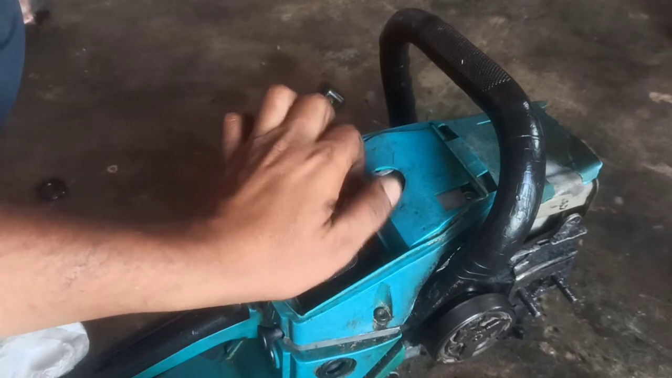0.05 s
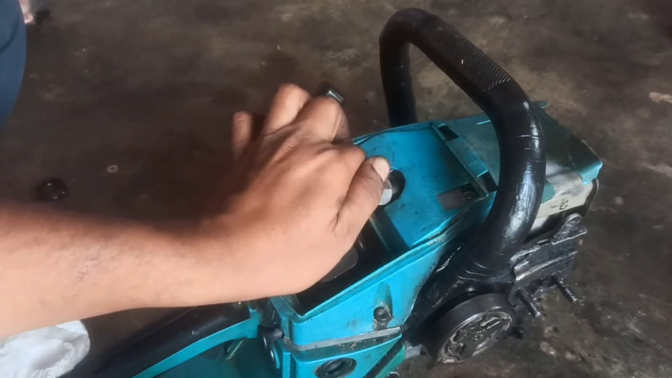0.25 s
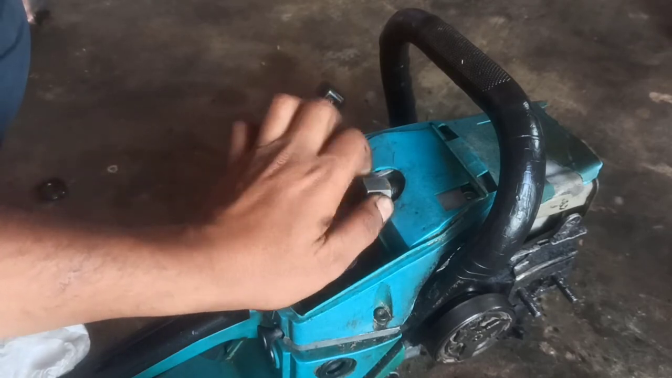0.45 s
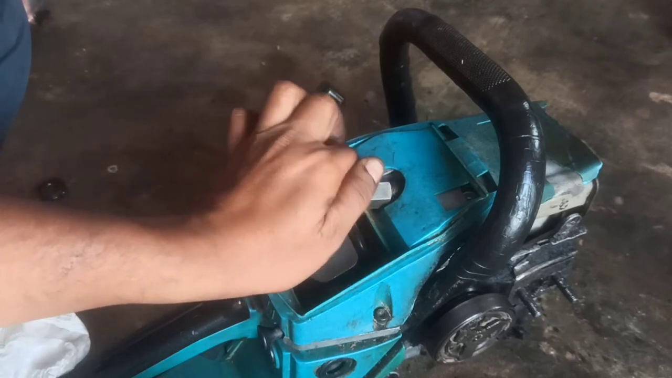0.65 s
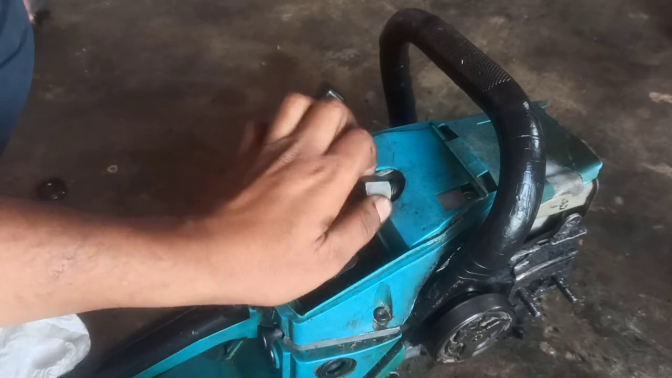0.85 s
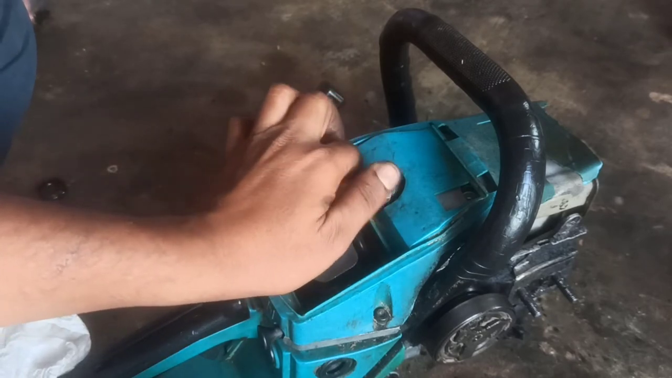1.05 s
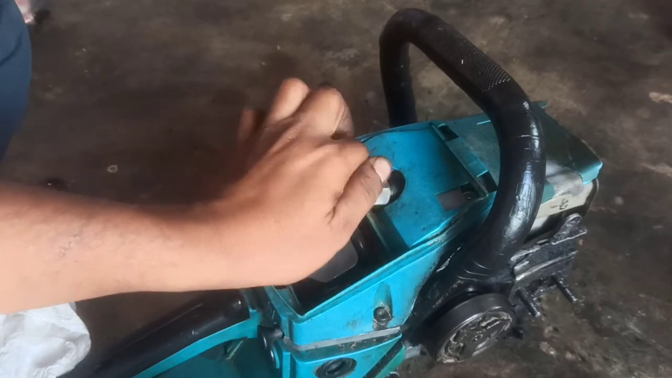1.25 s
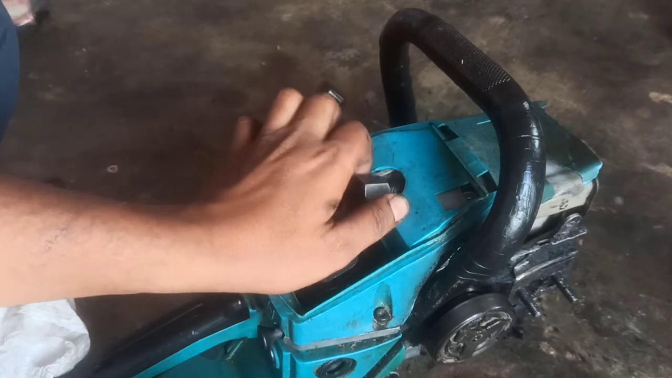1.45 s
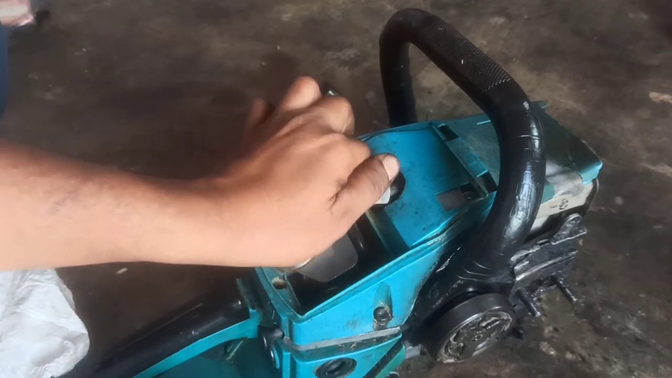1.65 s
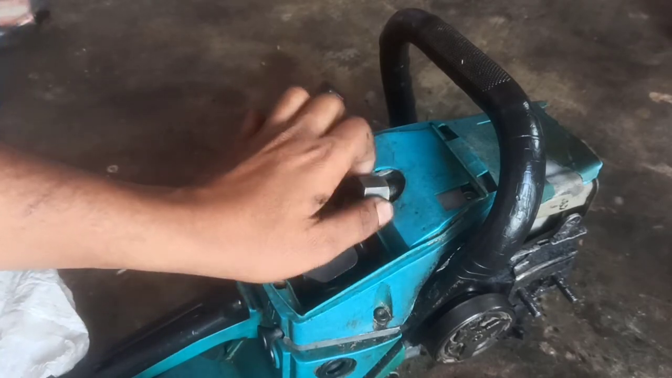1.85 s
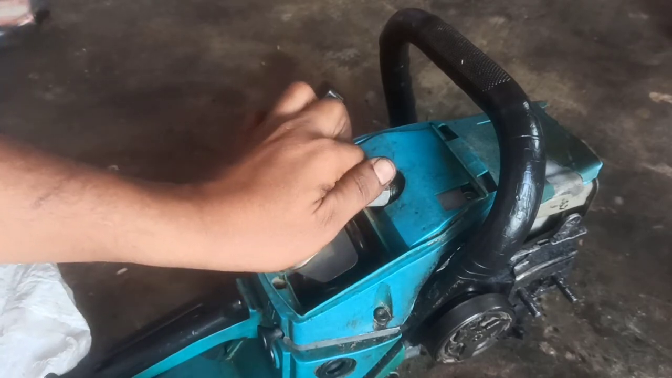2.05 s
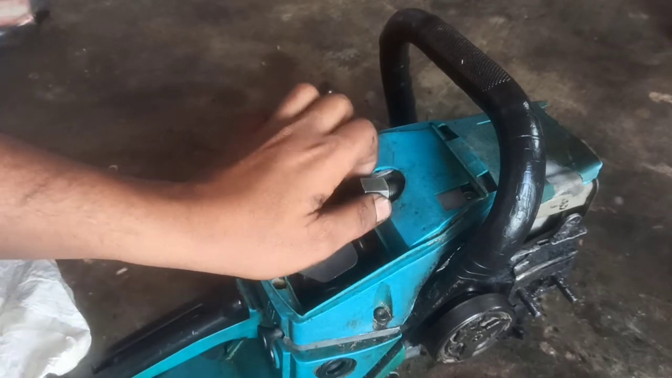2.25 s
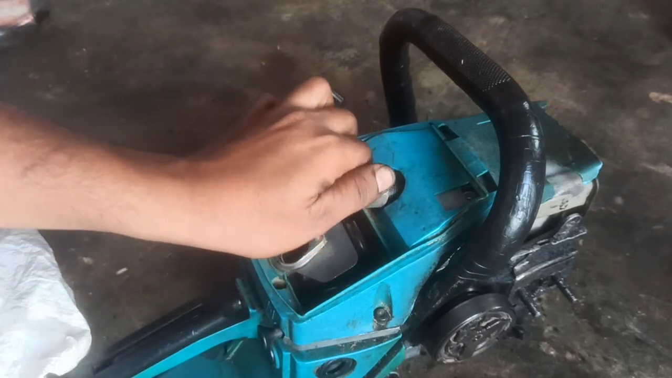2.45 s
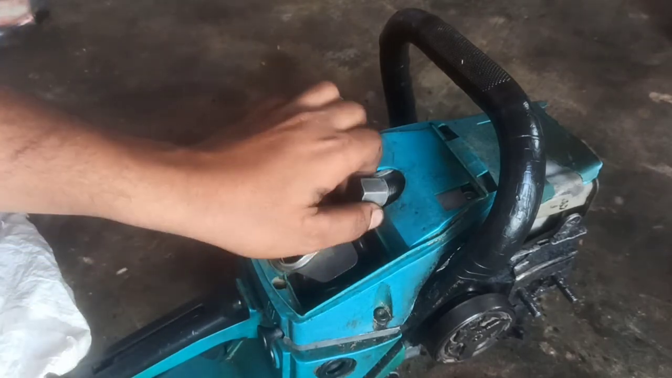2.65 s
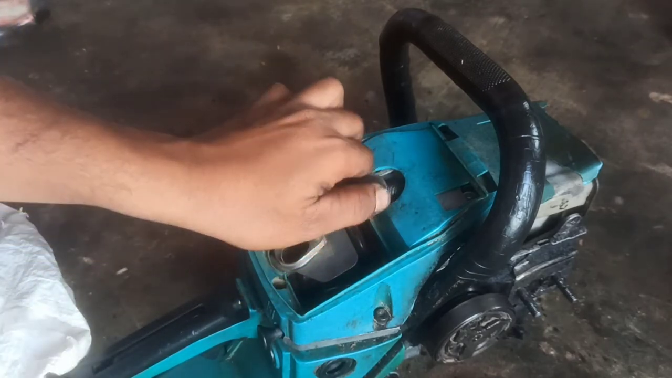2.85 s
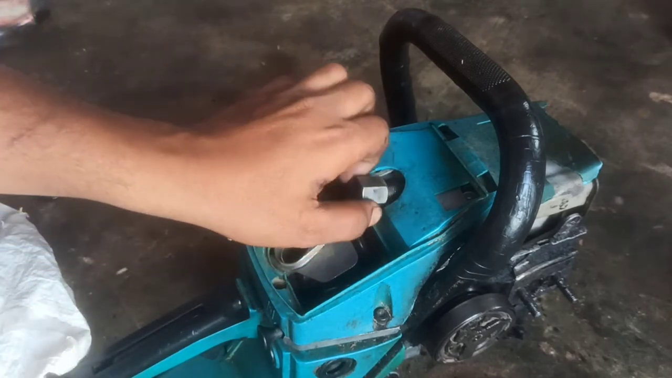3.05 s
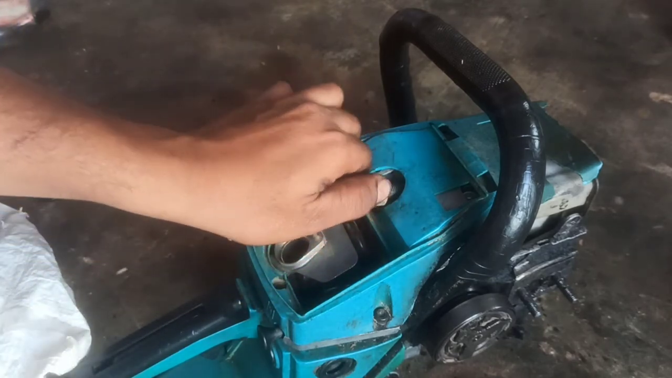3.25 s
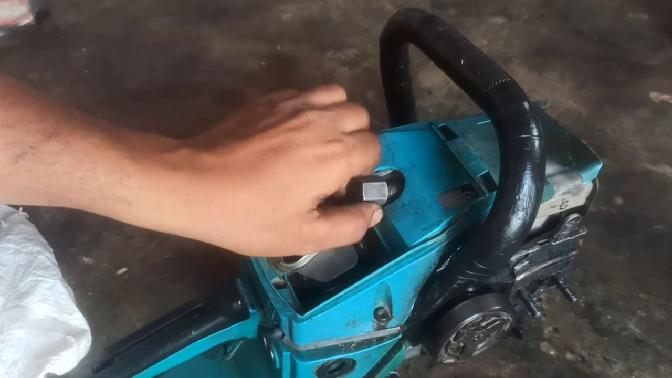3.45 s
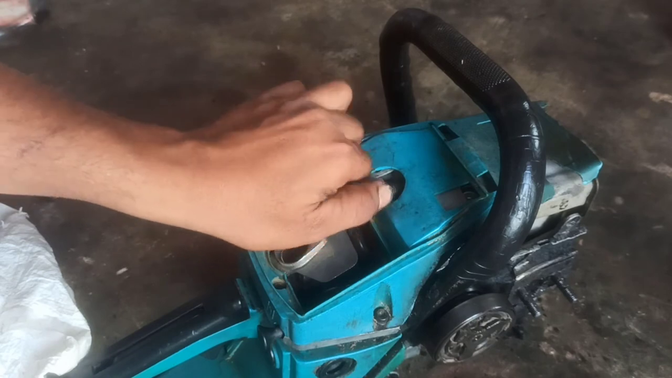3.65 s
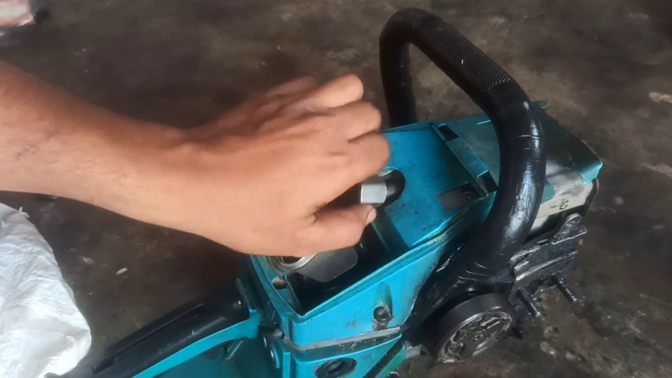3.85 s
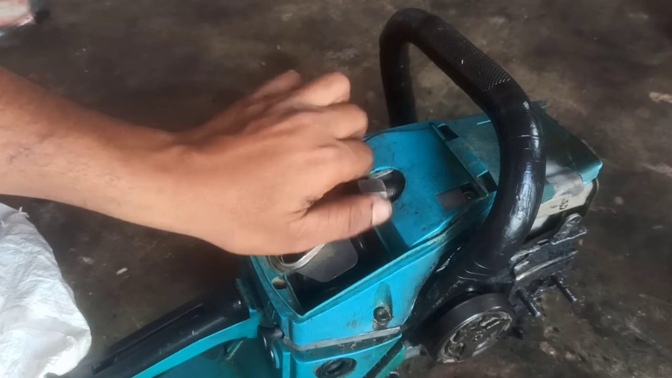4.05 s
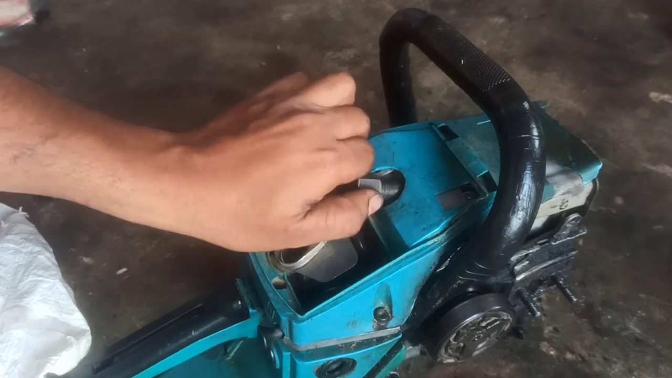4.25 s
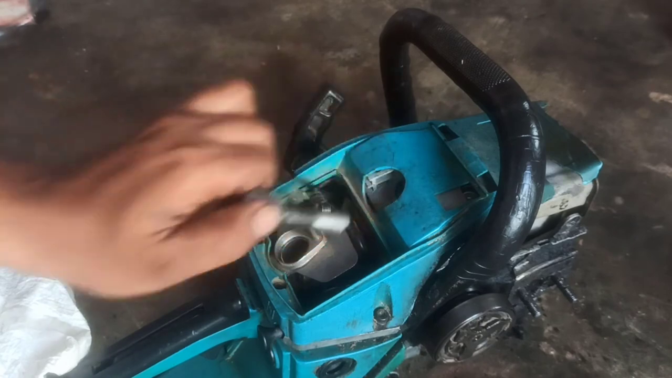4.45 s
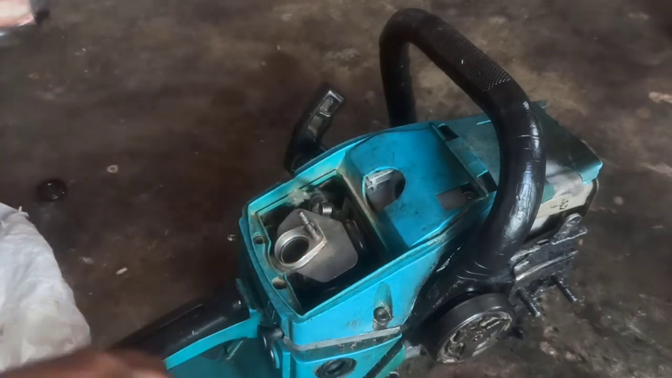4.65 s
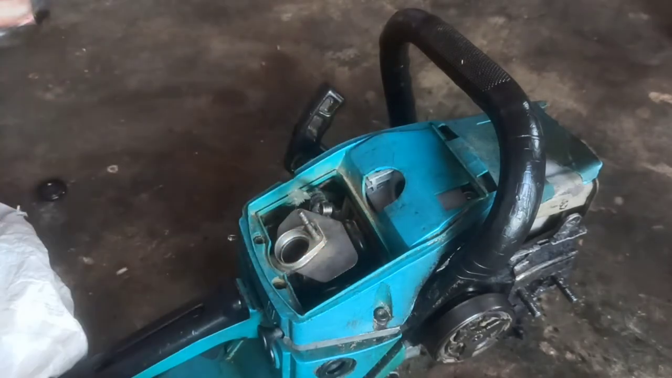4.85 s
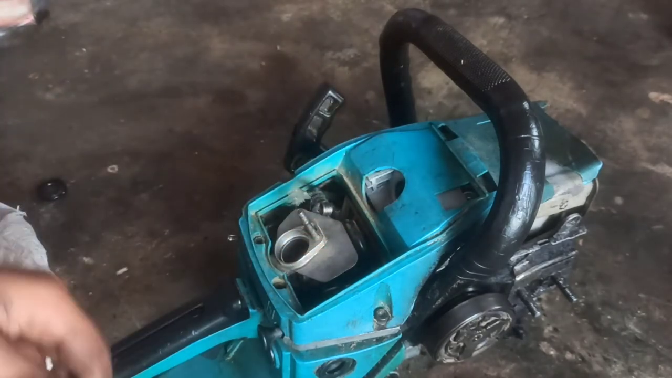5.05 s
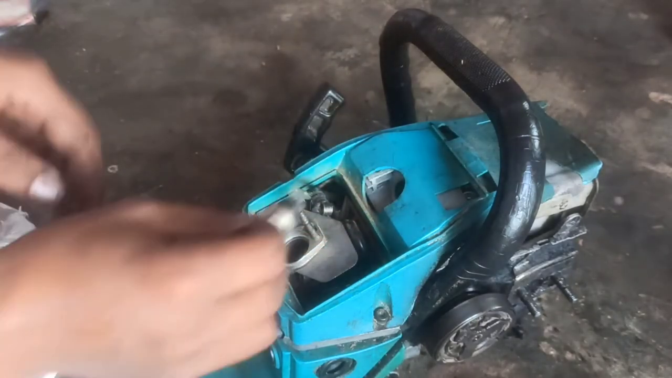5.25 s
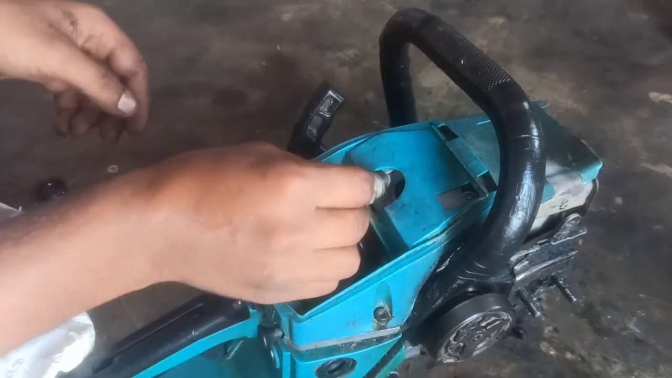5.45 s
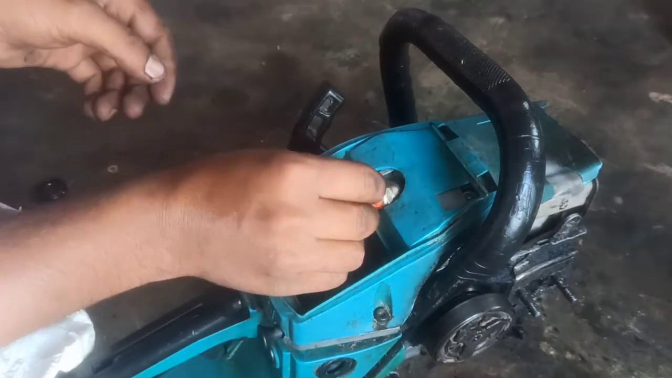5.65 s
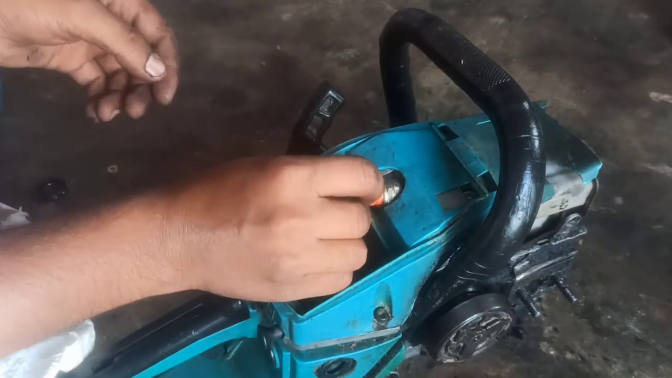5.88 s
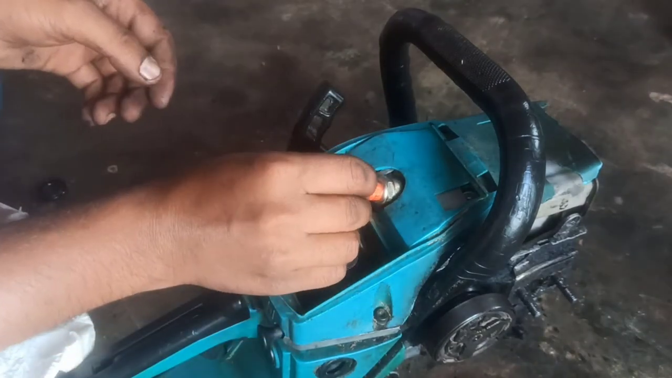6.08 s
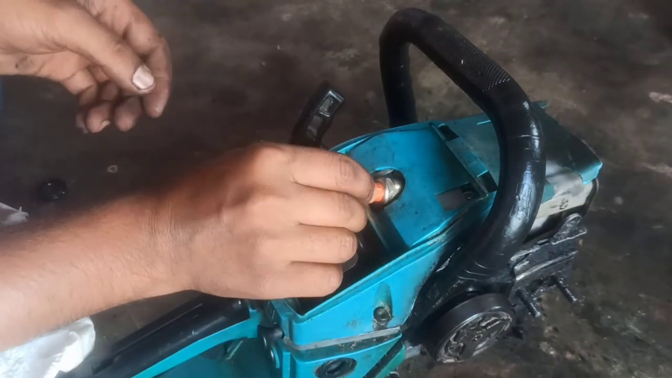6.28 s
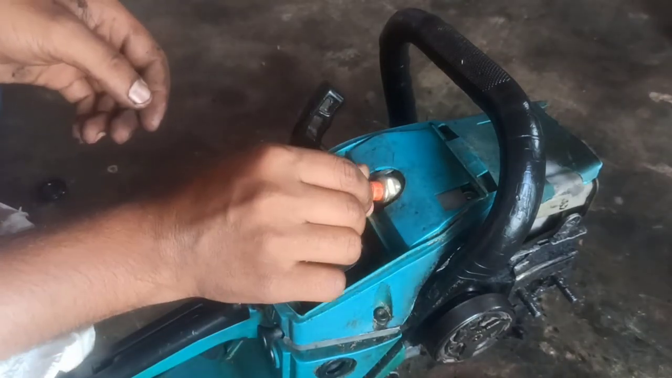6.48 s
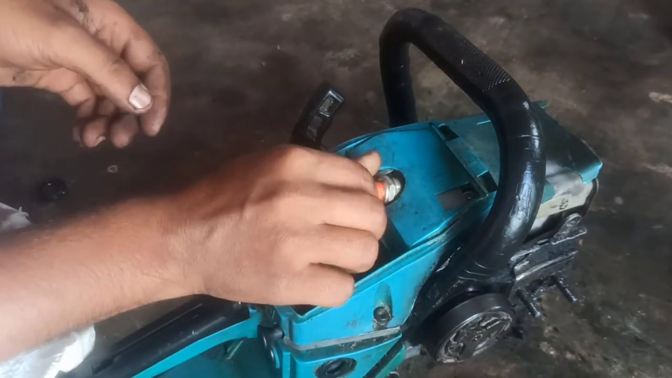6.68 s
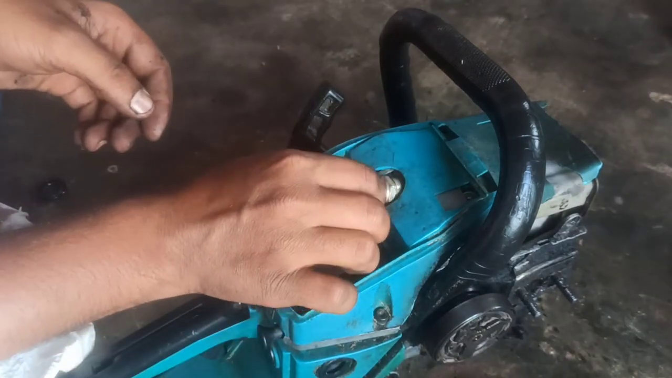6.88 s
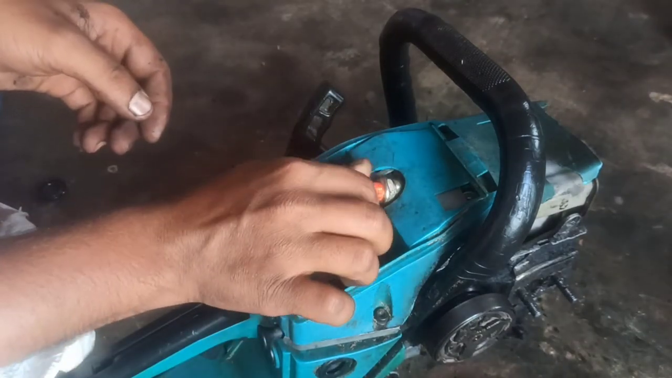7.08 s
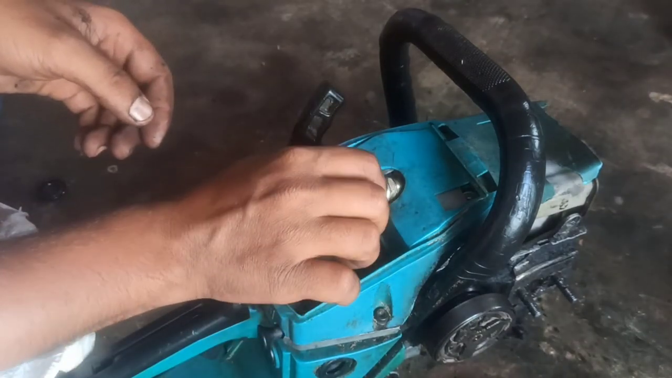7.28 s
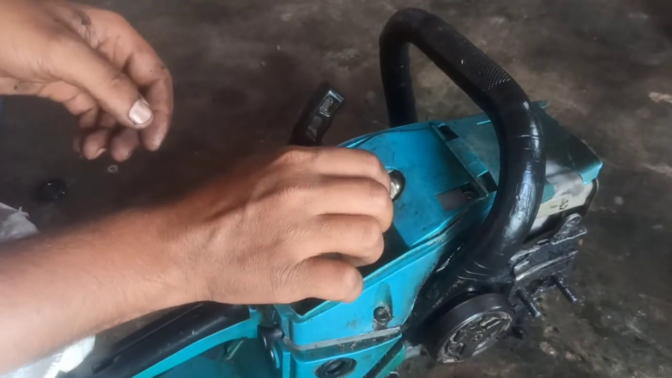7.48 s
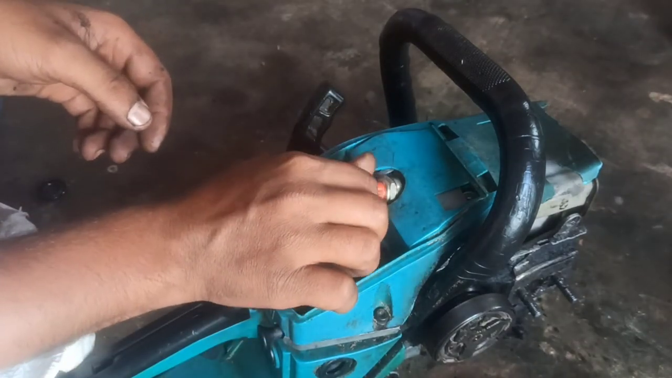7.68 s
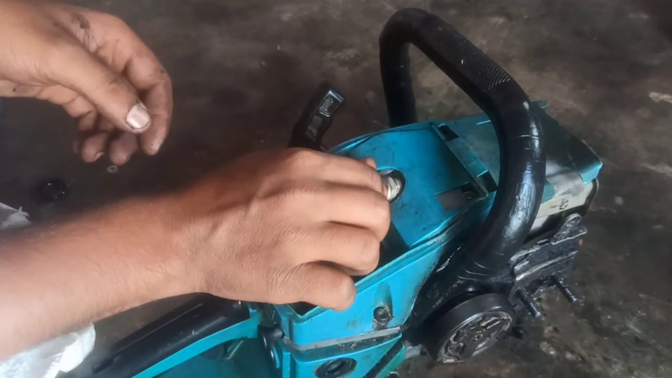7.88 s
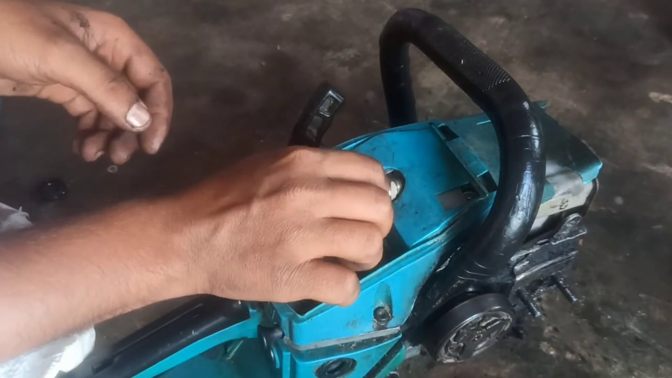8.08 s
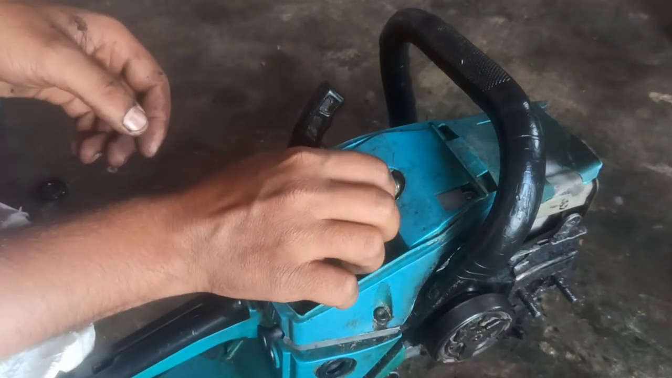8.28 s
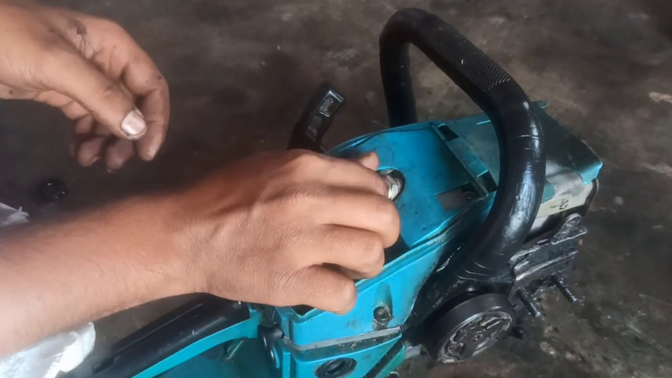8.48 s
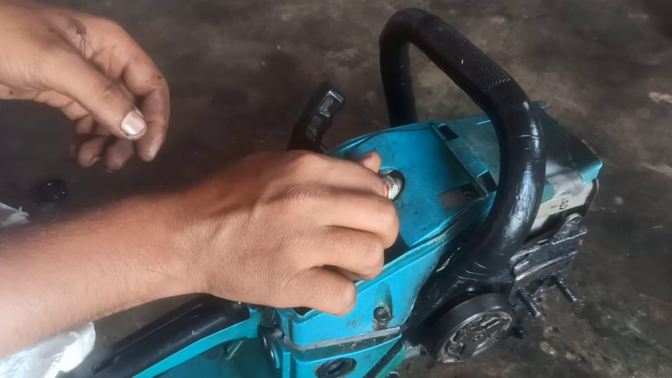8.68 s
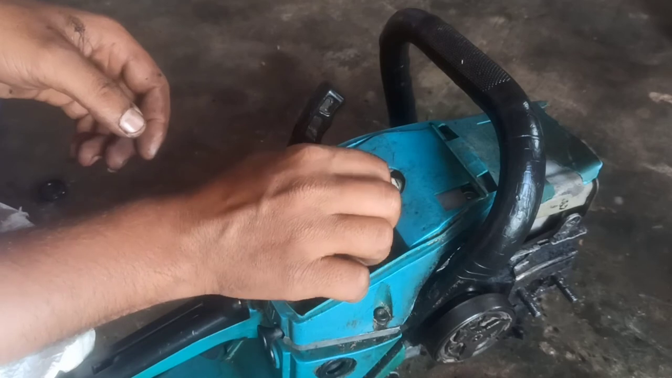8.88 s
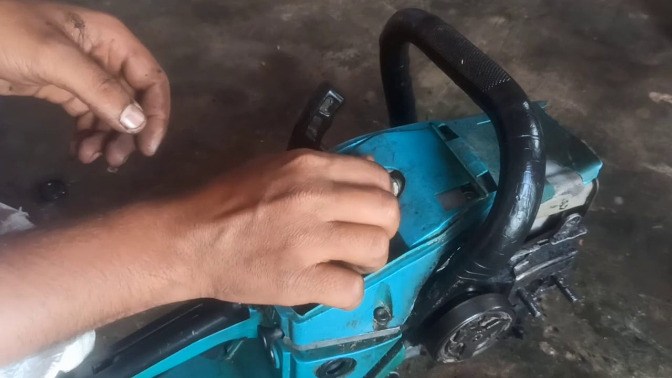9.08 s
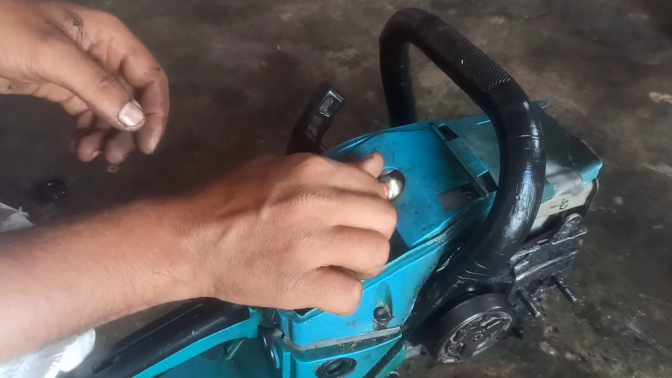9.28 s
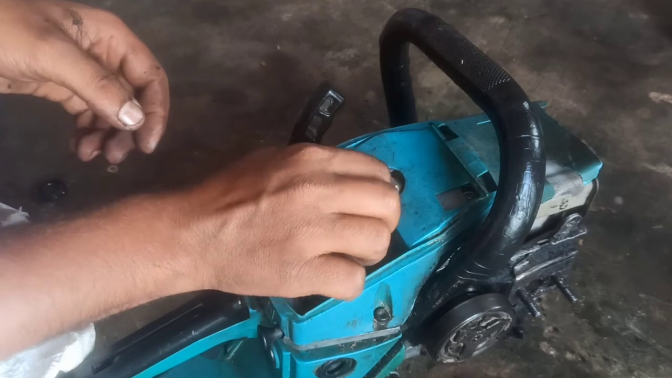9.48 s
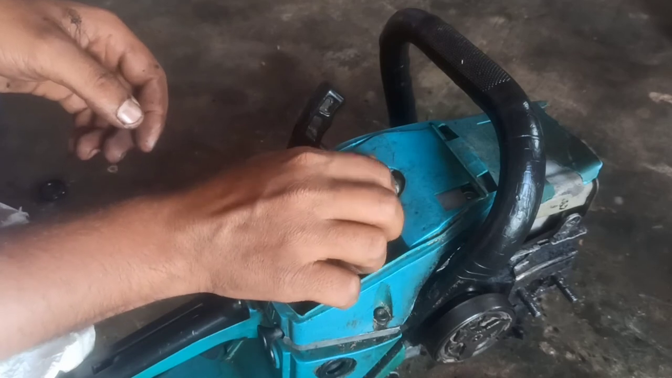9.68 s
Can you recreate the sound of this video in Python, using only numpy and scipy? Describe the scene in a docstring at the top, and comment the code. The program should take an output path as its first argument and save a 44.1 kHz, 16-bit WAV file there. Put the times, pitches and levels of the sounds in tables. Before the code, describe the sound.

After a soft low bump, quiet scratchy metal strokes repeat with tiny clicks over faint rumble and hiss. Scrapes and clinks build to a sharp housing knock, a brief lull, then a steel tool hits the concrete floor with thuds, cracks and a short ring. Quieter finger rubbing and taps follow. Close mono microphone, hard-walled reverberant workshop, slightly hollow, dull treble.

```python
"""Over a low rumble with hiss, a soft bump opens; a steel socket wrench rubs on a chainsaw's spark plug.
Hand strokes are swells of tiny slips; knocks ring the plastic housing's modes, and grit ticks dryly.
The wrench clinks free and clatters onto concrete as thuds, clacks, cracks and ringing steel.
Fingers then twist the plug out with softer rubs, ticks and knocks. A bare workshop echoes all but the
background; the treble is hollowed around 10 kHz and cut at the top, in mono."""
import sys
import numpy as np
from scipy import signal
from scipy.fft import rfft, irfft, next_fast_len
from scipy.io import wavfile
from scipy.ndimage import uniform_filter1d

SR = 44100
rng = np.random.default_rng(int(sys.argv[2]) if len(sys.argv) > 2 else 0)


def int16_out(signal):
    """Quantize to a 16-bit WAV file."""
    q = np.round(np.clip(np.atleast_2d(signal).T, -1, 1) * 32767)
    wavfile.write(sys.argv[1], SR, q.astype(np.int16))


N = 429093
T = np.arange(N) / SR
LIFT_S = 4.9  # the wrench leaves the plug


def undb(db):
    """Decibels to gain."""
    return 10 ** (np.asarray(db) / 20)


def unit(x):
    """Scale to rms 1."""
    return x / np.sqrt(np.mean(x ** 2))


def peak(x, db):
    """Scale to a peak level."""
    return x * undb(db) / np.abs(x).max()


def add(track, s, sound):
    """Mix a sound in at time s."""
    start = max(int(s * SR), 0)
    track[start:start + len(sound)] += sound[:max(N - start, 0)]


def curve(hz, points):
    """Join (Hz, value) points on a log-frequency axis."""
    f, value = np.transpose(points)
    return np.interp(np.log(hz + 1), np.log(f), value)


def colour(x, points):
    """Causal, minimum-phase filter with the given (Hz, dB) response."""
    size = 2 * next_fast_len(len(x) // 2 + 2048)
    hz = np.arange(size // 2 + 1) * SR / size
    cepstrum = irfft(np.log(undb(curve(hz, points))))
    # folding the cepstrum forward in time keeps the response from starting early
    cepstrum[1:size // 2] *= 2
    cepstrum[size // 2 + 1:] = 0
    return irfft(rfft(x, size) * np.exp(rfft(cepstrum)))[:len(x)]


def fade(t, t60):
    """Decay by 60 dB in t60 seconds."""
    return np.exp(-np.log(1000) * t / t60)


def ring(modes, detune=0., scatter_db=0.):
    """Half a second of damped modes, with optional random shifts of pitch and level at each blow."""
    t = T[:SR // 2]
    chance = rng.standard_normal((len(modes), 2))
    sound = np.zeros(len(t))
    for k, ((hz, db, t60), (pitch_shift, level_shift)) in enumerate(zip(modes, chance)):
        tone = np.sin(2 * np.pi * hz * (1 + detune * pitch_shift) * t)
        polarity = (-1) ** k
        sound += polarity * undb(db + scatter_db * level_shift) * fade(t, t60) * tone
    # a small body radiates little below its lowest mode
    return signal.sosfilt(signal.butter(1, modes[0][0] / 2, "high", fs=SR, output="sos"), sound)


def burst(t60):
    """The brief noise of two rough faces meeting: many equal slips that die away."""
    return np.sign(rng.standard_normal(SR // 2)) * fade(T[:SR // 2], t60)


# Colour of the steady rumble and hiss. Each row: frequency in Hz, relative density in dB per Hz.
BACKGROUND_COLOUR = [(25, -28.5), (50, -20.5), (80, -2.5), (140, 1.5), (230, -5.5), (420, -7), (850, -14.5),
                     (1500, -20.5), (3000, -24.5), (4500, -23), (7000, -25), (9000, -26), (12000, -25.5),
                     (15500, -25.5)]


def background(level_db=-62, bump_hz=88, bump_db=-54, bump_s=0.043, bump_length_s=0.097):
    """A steady low rumble with hiss, and a swell of low noise as one soft bump at the start."""
    air = unit(colour(rng.standard_normal(N), BACKGROUND_COLOUR)) * undb(level_db)
    band = [bump_hz / 1.48, bump_hz * 1.35]
    low = signal.sosfilt(signal.butter(3, band, "band", fs=SR, output="sos"), rng.standard_normal(N))
    swell = 1 / (1 + ((T - bump_s) / bump_length_s) ** 2)
    return air + unit(low) * undb(bump_db) * swell


def slips(per_s, spread_db):
    """Random tiny impulses; a few are much larger than the rest."""
    sizes = undb(spread_db * np.minimum(rng.exponential(size=N), 3))
    return np.sign(rng.standard_normal(N)) * sizes * (rng.random(N) < per_s / SR)


# Modes of the steel wrench. Each row: frequency in Hz, level in dB, t60 in seconds.
WRENCH_MODES = [(1762, 0, 0.072), (1970, -15, 0.33), (2400, -3.5, 0.42), (2927, -1.5, 0.18),
                (3890, -5, 0.24), (4610, -0.5, 0.29), (5200, -3.5, 0.33), (5390, 1.5, 0.13),
                (6700, -7.5, 0.23), (6980, 3.5, 0.04), (6360, -16, 0.086), (7050, -4.5, 0.16)]


def steel(split=0.012, twin_db=-3):
    """The wrench is not quite round, so each of its modes has a slightly detuned twin."""
    return ring(WRENCH_MODES) + undb(twin_db) * ring(WRENCH_MODES, detune=split, scatter_db=2)


# Strokes of the wrench, about three a second, the last two dragging it off the plug.
# Each row: middle in seconds, length in seconds, relative level in dB.
WRENCH_STROKES = [(0.259, 0.054, -56.5), (0.639, 0.049, -55.5), (0.977, .1, -58), (1.278, 0.074, -56.5),
                  (1.612, 0.14, -59), (1.878, 0.053, -63), (2.025, 0.063, -55.5), (2.384, 0.035, -53),
                  (2.797, 0.038, -57), (3.212, 0.065, -56), (3.544, 0.025, -57.5), (3.967, 0.032, -50.5),
                  (4.301, 0.046, -45.5), (4.381, .042, -45)]
# A hand brushes past with a soft bright hiss. Each entry: middle in seconds.
HAND_BRUSHES = [2.187, 4.79]
# Twists of the plug between the fingers, firmer where the thread catches.
# Each row: middle in seconds, length in seconds, relative level in dB.
FINGER_TWISTS = [(6.57, 0.17, -61.5), (7.06, 0.11, -63), (7.318, .034, -60), (7.679, 0.051, -59.5),
                 (7.946, .07, -62), (8.187, 0.025, -46), (8.455, 0.032, -59), (8.7, 0.028, -56),
                 (9.256, 0.017, -58), (9.345, 0.037, -61.5), (9.616, 0.1, -63.5)]


def movements(tight_tilt=0.1, loose_tilt=-4.5, twist_tilt=-1.9, brush_tilt=6.5):
    """List rubs as (middle s, length s, relative dB, tilt dB per octave); they dull as the plug loosens."""
    wrench = [(s, length, db, np.interp(s, [0, LIFT_S], [tight_tilt, loose_tilt]))
              for s, length, db in WRENCH_STROKES]
    fingers = [(s, length, db, twist_tilt) for s, length, db in FINGER_TWISTS]
    hand = [(s, 0.13, -60.5, brush_tilt) for s in HAND_BRUSHES]
    return wrench + fingers + hand


# Colour of steel rubbing in the plug well. Each row: frequency in Hz, gain in dB.
RUB_COLOUR = [(60, -43), (150, -5.5), (320, -4), (900, 4), (1200, 2), (1800, -6), (3300, -7), (4600, -3.5),
              (7000, -2.5), (9000, -6), (15000, -16.5)]
# Modes of the plastic housing. Each row: nominal frequency in Hz, level in dB, t60 in seconds.
HOUSING_MODES = [(324, 2, 0.025), (616, -9.5, 0.05), (725, -5, 0.051), (949, 2.5, 0.033), (1276, 0, 0.011),
                 (1464, -0.5, 0.019), (1943, 0, 0.019), (2640, 1.5, 0.0093), (3280, 4, 0.0068),
                 (4300, 1.5, 0.0071), (6870, -11, 0.01)]
# Modes of a hard clack. Each row: nominal frequency in Hz, level in dB, t60 in seconds.
CLACK_MODES = [(862, -20.5, 0.013), (1610, -4.5, 0.013), (2080, -6.5, 0.0058), (3174, -16, 0.012)]


def rubbing(steel_db=-6, catch_db=0, jerk_db=3.5, idle_db=-77.5, pressure_db=-3.5):
    """Swells of fine slips keep the steel ringing faintly; coarser catches rattle the housing."""
    # pressure wavers by up to jerk_db either way
    jerks = undb(jerk_db * np.tanh(unit(uniform_filter1d(rng.standard_normal(N), size=250))))
    fine = slips(3500, 2.06) * jerks
    coarse = slips(190, 2.5) * jerks
    ringing = signal.fftconvolve(fine, steel())[:N]
    rattle = signal.fftconvolve(coarse, ring(CLACK_MODES) + ring(HOUSING_MODES) / 3)[:N]
    rub = unit(colour(fine, RUB_COLOUR))
    rub += undb(steel_db) * unit(ringing)
    rub += undb(catch_db) * unit(rattle)
    out = undb(idle_db) * rub * (T < LIFT_S)  # the wrench rests on the plug until it is lifted off
    for s, length, db, tilt in movements():
        near = slice(max(int((s - 2 * length) * SR), 0), int((s + 2 * length) * SR))
        stroke = unit(colour(rub[near], [(600, -1.5 * tilt), (4800, 1.5 * tilt)]))
        swell = np.exp(-2 * ((T[near] - s) / length) ** 2)
        out[near] += undb(db + pressure_db) * stroke * swell
    return out


# Knocks on the housing. Each row: start in seconds, peak of the housing's ring in dB,
# hardness of the contact from 0 (softest) to 1 (bare steel), pitch ratio of the struck spot.
HOUSING_KNOCKS = [(0.087, -42.5, .05, 0.9), (.321, -49, 0, .91), (4.001, -38.5, 0.97, 0.93),
                  (4.2591, -32, 0.71, 0.874), (4.317, -36.5, .66, .9), (4.386, -37.5, 0.79, .89),
                  (4.4239, -17.5, .34, 0.973), (5.6211, -26.5, 0.1, 0.982), (5.64, -39, 0.46, 1.15),
                  (8.184, -36, 0.5, 1.2), (8.239, -41.5, 0.4, 0.85), (8.694, -35.5, 0.05, 1.01)]


def contacts(rebound_s=.0048, rebound_db=-11.5, rebound_hardness=0.28):
    """Every knock rebounds once, weaker and softer; a harder contact is brighter, sings and scrapes more."""
    rebounds = [(s + rebound_s, db + rebound_db, hard * rebound_hardness, ratio)
                for s, db, hard, ratio in HOUSING_KNOCKS]
    for s, db, hard, ratio in HOUSING_KNOCKS + rebounds:
        cut_hz = np.interp(hard, [0, 1], [800, 5700])
        # both relative to the housing's ring
        sing_db = np.interp(hard, [0, 1], [-42, 3])
        scrape_db = np.interp(hard, [0, 1], [-26, 6])
        yield s, db, cut_hz, ratio, sing_db, scrape_db


# Colour of steel scraping past the plug. Each row: frequency in Hz, gain in dB.
SCRAPE_COLOUR = [(100, -28), (400, 6), (1200, -10.5), (2200, 6), (3500, -10), (5000, 3.5), (7200, -6),
                 (9000, -9), (15000, -25)]


def knocks(chatter_db=-25, chatter_t60=0.07, scrape_t60=0.057):
    """A blow and its chatter ring the housing; soft contacts are duller, bare steel scrapes and sings on."""
    out = np.zeros(N)
    for s, db, cut_hz, ratio, sing_db, scrape_db in contacts():
        push = undb(chatter_db) * burst(chatter_t60)
        push = signal.sosfilt(signal.butter(1, 2000, "high", fs=SR, output="sos"), push)
        push[0] += 1  # the blow itself
        push = signal.sosfilt(signal.butter(2, min(cut_hz, SR / 3), fs=SR, output="sos"), push)
        spot = [(hz * ratio, mode_db, t60) for hz, mode_db, t60 in HOUSING_MODES]
        body = signal.fftconvolve(push, ring(spot, detune=0.027))[:len(push)]
        add(out, s, peak(body, db))
        add(out, s, peak(steel(), db + sing_db))
        add(out, s, peak(colour(burst(scrape_t60), SCRAPE_COLOUR), db + scrape_db))
    return out


def grit(per_s=1, db=-56, centre_hz=2730, spread_octaves=0.6):
    """Faint ticks at random moments as (start s, peak dB, pitch Hz)."""
    chance = rng.random(size=(40, 2))
    times = np.cumsum(-np.log(1 - chance[:, 0])) / per_s
    pitches = centre_hz * 2 ** (spread_octaves * (2 * chance[:, 1] - 1))
    return [(s, db, hz) for s, hz in zip(times, pitches) if s < T[-1]]


# The clearest ticks of thread, grit and fingernail.
# Each row: start in seconds, peak of the click in dB, pitch in Hz.
CLEAR_TICKS = [(0.8099, -45.5, 2230), (1.095, -45, 11900), (1.438, -50, 1230), (1.5218, -48.5, 3030),
               (2.255, -46.5, 1260), (3.0773, -50, 2370), (3.354, -49.5, 1770), (3.6482, -42.5, 1660),
               (3.7274, -45.5, 2640), (3.78, -51.5, 1610), (4.847, -44.5, 5100), (6.065, -46.5, 12400),
               (6.0648, -47, 1326), (6.1691, -46.5, 1210), (7.178, -50.5, 3900), (7.809, -47, 2770),
               (8.3026, -51.5, 2240), (8.3303, -47, 3030), (8.57, -50.5, 2780)]


def ticks(low_db=-13, below_db=-3, above_db=-5.5, high_db=-20, tone_db=-10.0):
    """Short dry clicks of coloured noise, each with a brief ring at its own pitch."""
    out = np.zeros(N)
    for s, db, hz in CLEAR_TICKS + grit():
        t60 = 0.03 * (2000 / hz) ** 0.53  # higher ticks die sooner
        octaves = hz * 2. ** np.array([-2, -.5, 0, .5, 1.25])
        shape = list(zip(octaves, [low_db, below_db, 0, above_db, high_db]))
        add(out, s, peak(colour(burst(t60), shape), db))
        add(out, s, peak(ring([(hz, 0, t60)]), db + tone_db))
    return out


# The wrench lands and bounces.
# Each row: start in seconds, then the peaks of thud, clack and crack in dB.
LANDINGS = [(4.9265, -16, -12.5, -20.5), (4.959, -14.5, -23, -14.5), (4.9645, -26.5, -31, -17),
            (5.0132, -50, -19, -10), (5.035, -67, -23, -30), (5.047, -40, -29, -29)]
# Dull part of a landing on concrete. Each row: nominal frequency in Hz, level in dB, t60 in seconds.
THUD_MODES = [(219, 1, 0.039), (414, 6, 0.016), (863, -0.5, 0.018)]
# Thin ping of the tube. Each row: nominal frequency in Hz, level in dB, t60 in seconds.
PING_MODES = [(12780, 0, 0.24)]
# Colour of the contact crack. Each row: frequency in Hz, gain in dB.
CRACK_COLOUR = [(80, -57), (300, -12), (1500, -0.5), (3500, 1.5), (5500, 0), (7500, -4.5), (12000, -18),
                (15500, -9)]


def clatter(crack_t60=0.014, second_edge_s=.0017, second_edge_db=-4, ring_db=-16, ping_db=-13.5):
    """The wrench falls on the concrete; at each landing its other edge strikes just after the first."""
    out = np.zeros(N)
    for s, thud_db, clack_db, crack_db in LANDINGS:
        add(out, s, peak(ring(THUD_MODES, detune=0.039), thud_db))
        add(out, s, peak(ring(CLACK_MODES, detune=0.05), clack_db))
        second_edge = colour(burst(crack_t60), RUB_COLOUR)
        add(out, s + second_edge_s, peak(second_edge, clack_db + second_edge_db))
        add(out, s, peak(colour(burst(crack_t60), CRACK_COLOUR), crack_db))
        add(out, s, peak(steel(), clack_db + ring_db))
        add(out, s, peak(ring(PING_MODES, detune=0.000067), crack_db + ping_db))
    return out


# Reverberation of the workshop. Each row: band centre in Hz, t60 in seconds, relative level in dB.
ROOM_BANDS = [(100, 0.98, -7.5), (204, 0.88, -3), (503, 0.87, -4.5), (1190, 0.75, -7), (2500, 0.81, -4),
              (5000, 0.71, -3.5), (8000, 0.77, -8.5), (13100, 0.37, -1.5)]


def workshop(dry, wet_db, build_s):
    """Hard walls and floor: a dense echo that builds up quickly and dies soonest in the treble."""
    t = T[:SR]
    noise = rfft(rng.standard_normal(SR))
    centres = [row[0] for row in ROOM_BANDS]
    echo = np.zeros(SR)
    # each share is 1 at its own band centre and 0 at the others
    for share, (_, t60, db) in zip(np.eye(len(ROOM_BANDS)), ROOM_BANDS):
        band = irfft(noise * curve(np.arange(len(noise)), list(zip(centres, share))))
        echo += undb(db) * band * fade(t, t60)
    echo *= (1 - np.exp(-(t / build_s) ** 2)) / np.sqrt(SR / 20)
    return dry + undb(wet_db) * signal.fftconvolve(dry, echo)[:N]


def scene():
    """The saw and the spot where the wrench lands each have their own echo; both channels are the same."""
    at_saw = workshop(rubbing() + ticks() + knocks(), wet_db=0, build_s=0.0063)
    on_floor = workshop(clatter(), wet_db=1.5, build_s=0.01)
    mono = at_saw + on_floor + background()
    return np.array([mono, mono])


# Overall treble colour, with a deep hollow around 9 to 11 kHz. Each row: frequency in Hz, gain in dB.
TREBLE_COLOUR = [(4700, 1.5), (5000, -7.5), (5950, -5.5), (6250, 3.5), (7600, 0), (8400, -4), (8800, -18),
                 (11300, -19.5), (11800, -6), (13000, -5), (15500, -3)]


def record(dry, top_hz=15850):
    """Hollow out the treble and cut steeply above top_hz."""
    heard = np.array([colour(channel, TREBLE_COLOUR) for channel in dry])
    return signal.sosfilt(signal.ellip(10, .2, 80, top_hz, fs=SR, output="sos"), heard)


dry = scene()
out = record(dry)
int16_out(out)
```